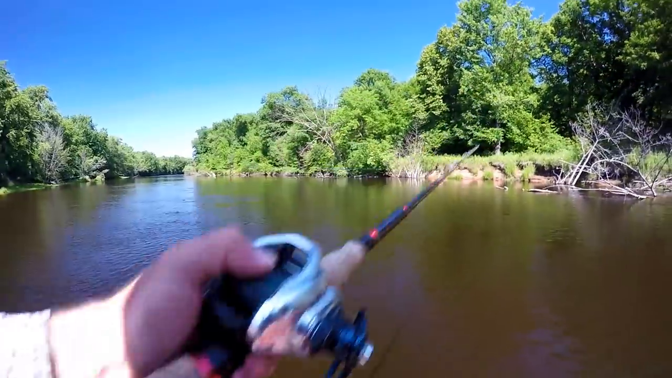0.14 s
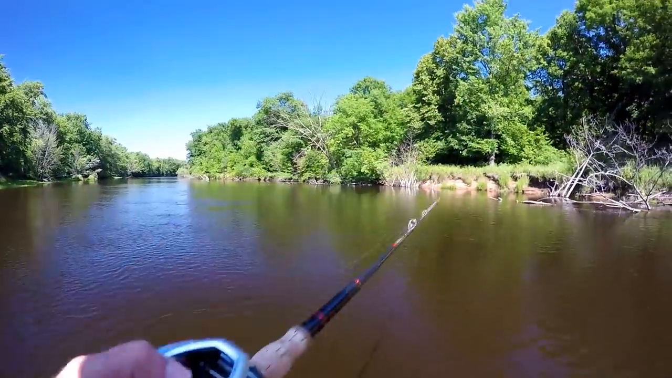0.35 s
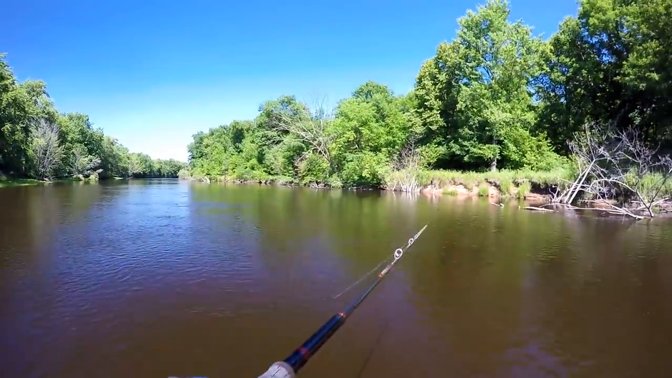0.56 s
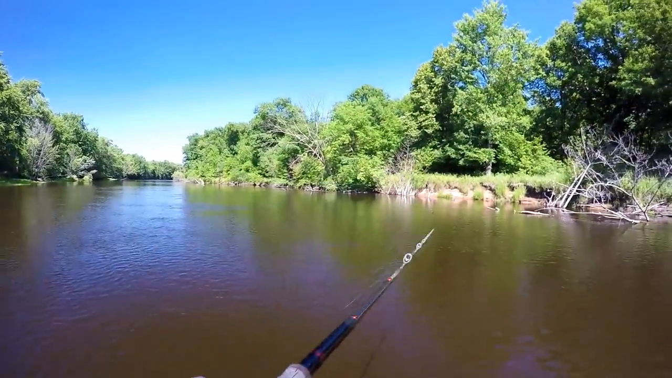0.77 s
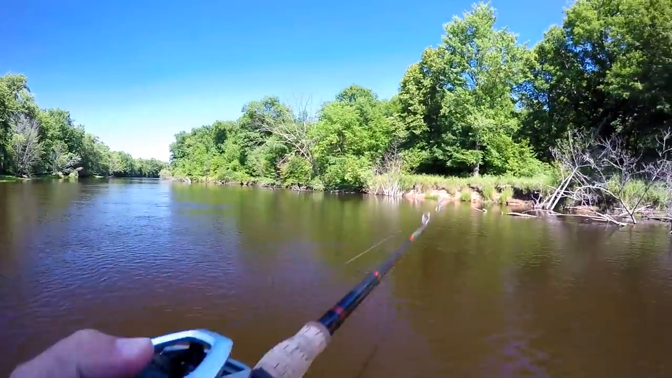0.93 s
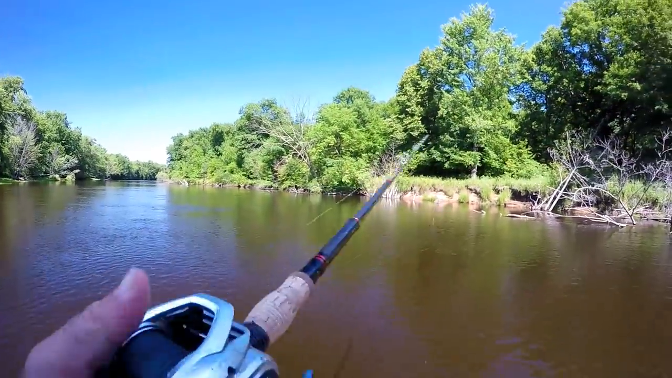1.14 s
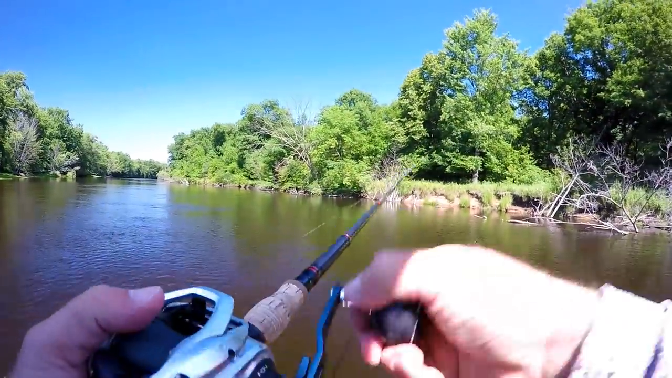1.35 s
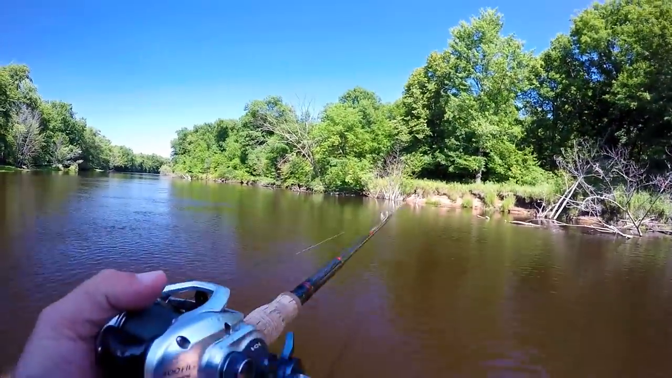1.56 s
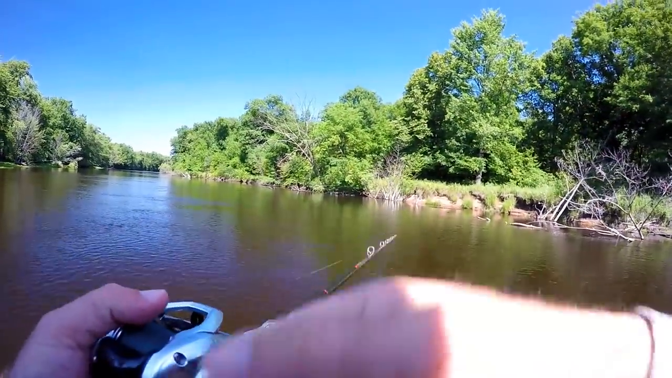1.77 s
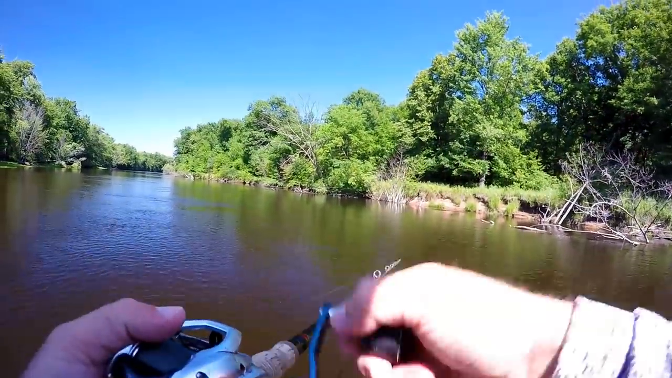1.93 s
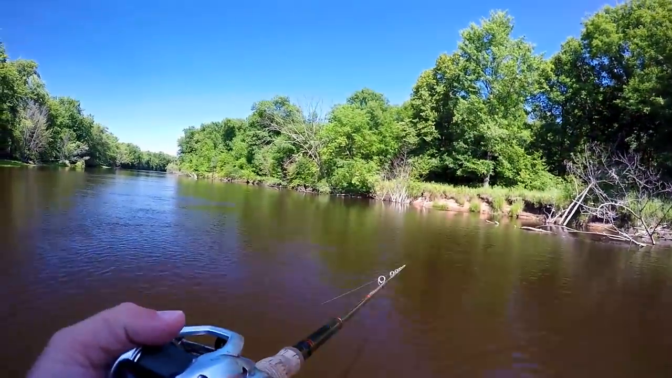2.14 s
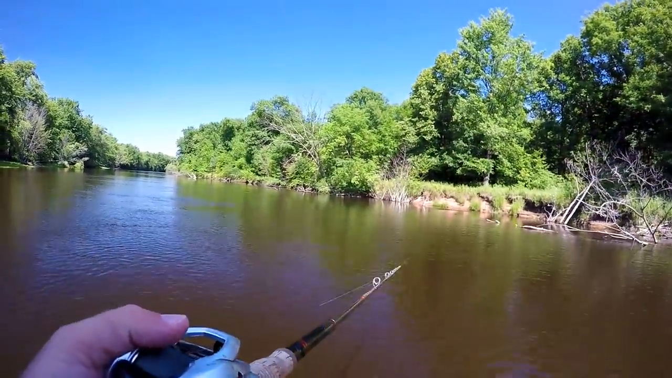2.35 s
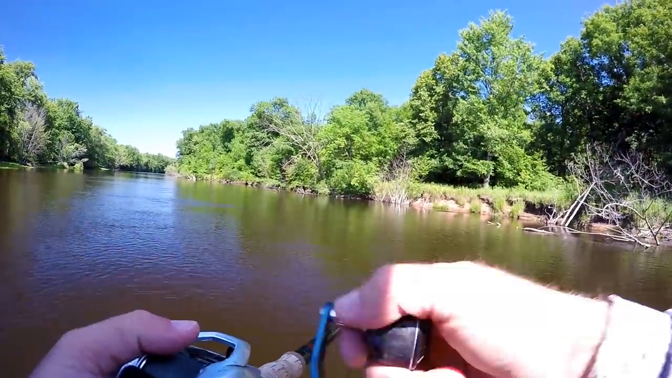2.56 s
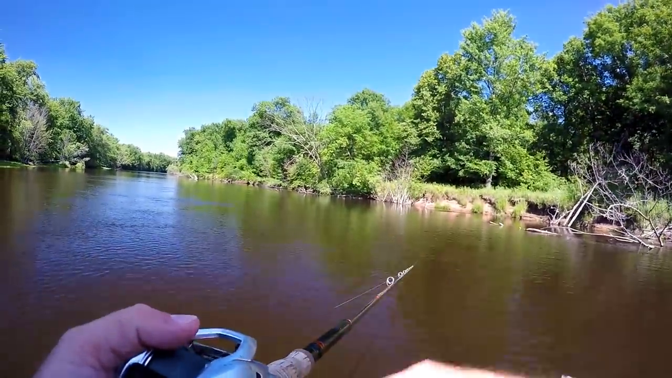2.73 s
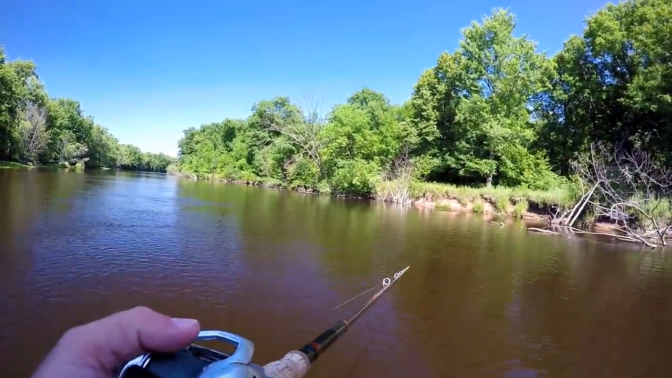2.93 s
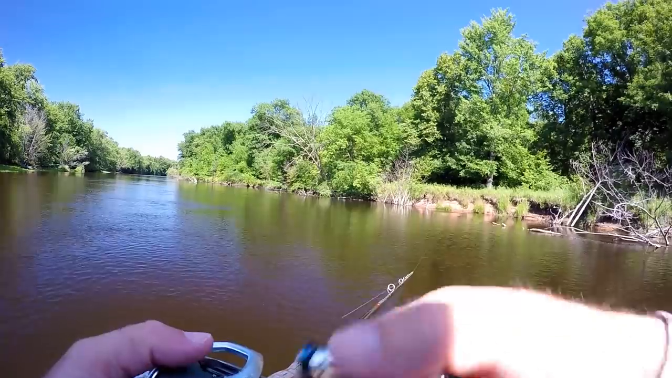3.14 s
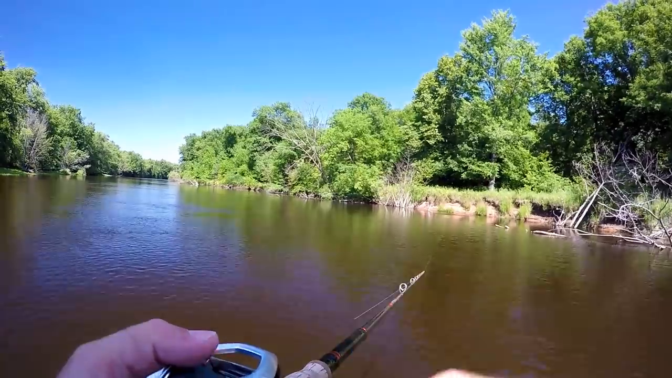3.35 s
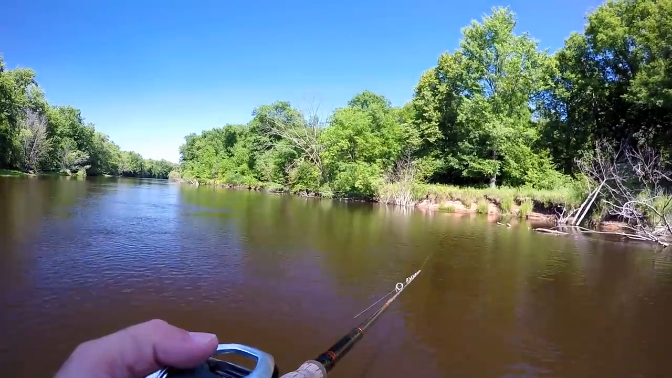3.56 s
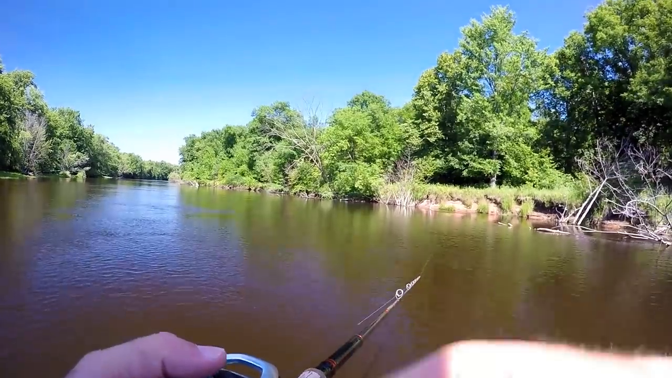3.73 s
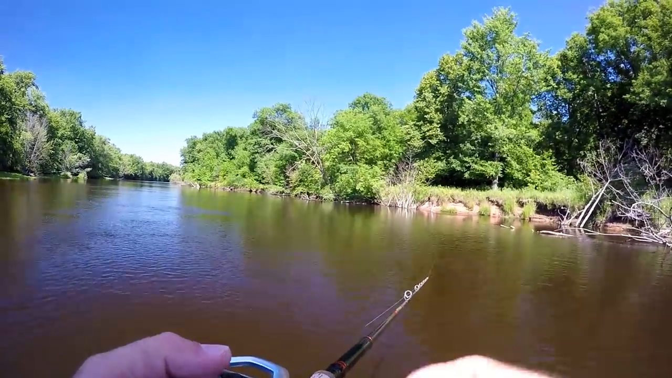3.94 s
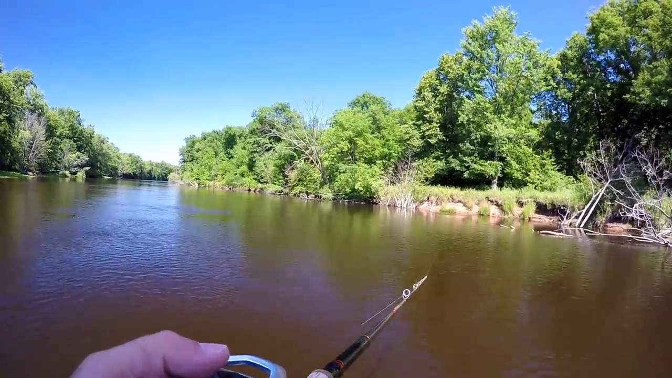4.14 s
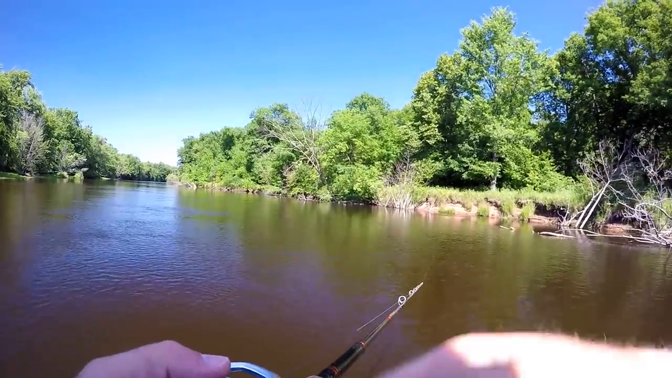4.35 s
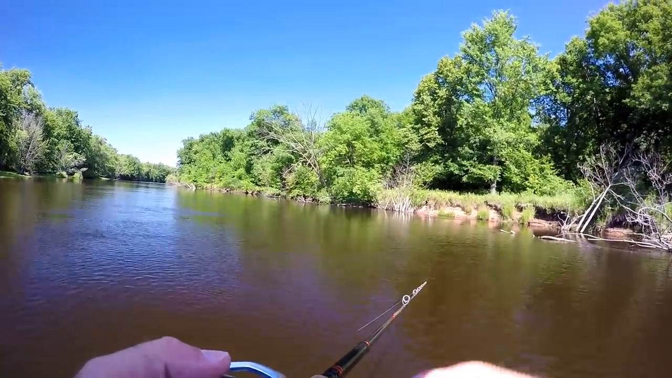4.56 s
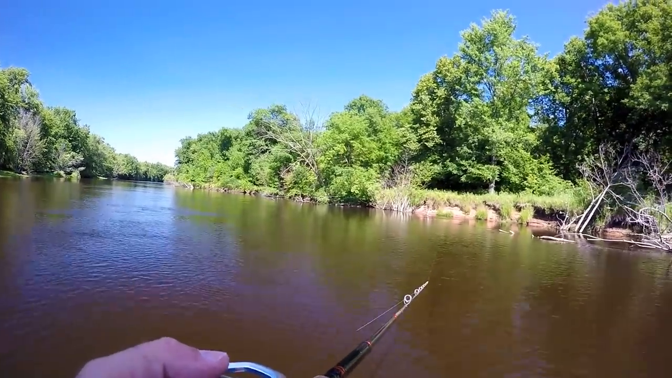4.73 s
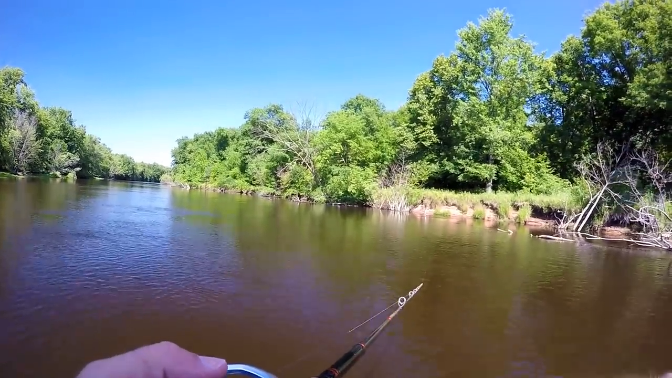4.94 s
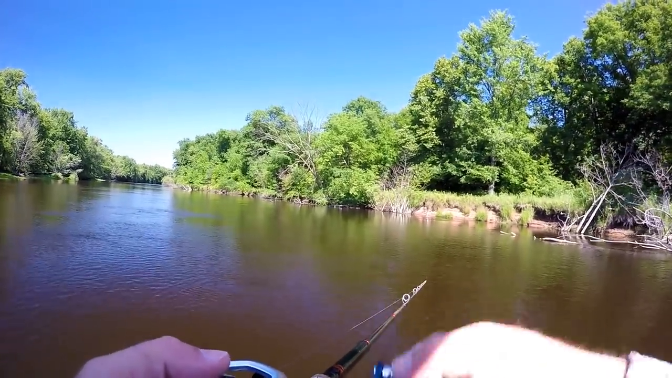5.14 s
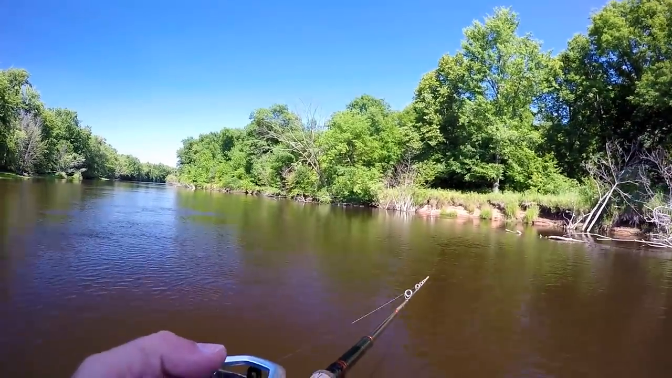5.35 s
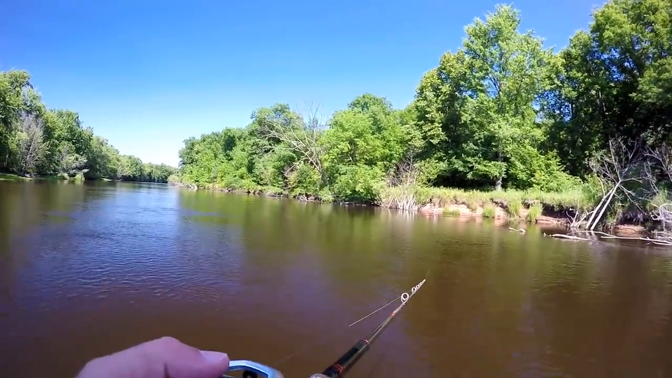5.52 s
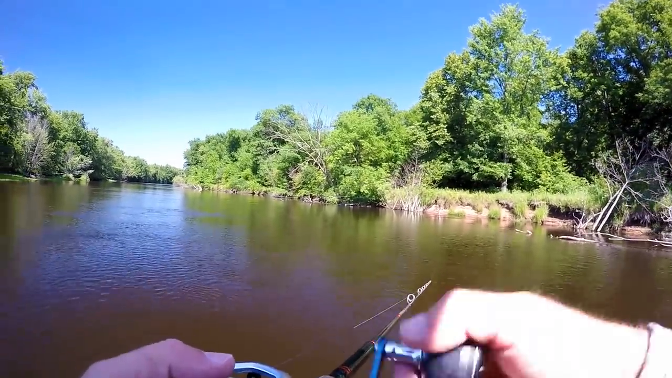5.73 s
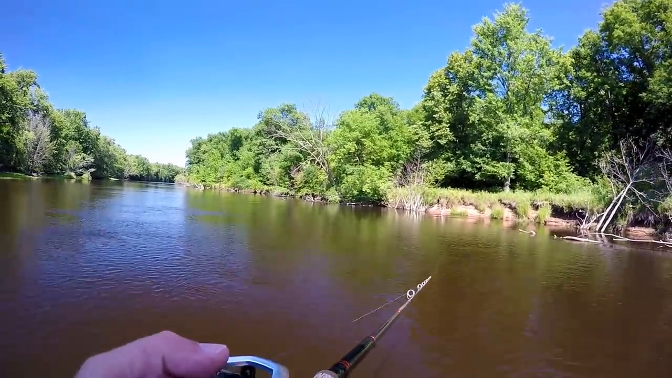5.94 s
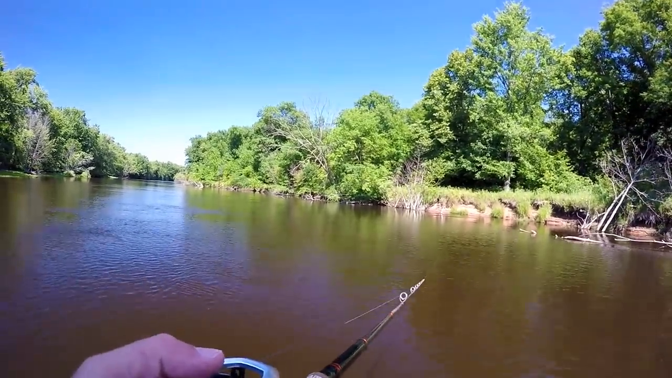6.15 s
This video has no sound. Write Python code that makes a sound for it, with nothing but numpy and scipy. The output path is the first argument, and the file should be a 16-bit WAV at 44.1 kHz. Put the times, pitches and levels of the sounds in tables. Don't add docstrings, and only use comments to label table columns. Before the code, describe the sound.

Close to the microphone, a cast sends wet line whirring and slapping through rod guides for under a second, fading as it slows. Soft knocks follow, then one sharp, loud metallic snap of the reel clutch. Quiet winding begins with a faint gear hum, while water glugs evenly under a small boat about eight times a second. Birds chip and whistle over river wash and light wind rumble.

```python
import sys
import numpy as np
from scipy import signal
from scipy.fft import rfft, irfft
from scipy.io import wavfile

SR = 44100
rng = np.random.default_rng(int(sys.argv[2]) if len(sys.argv) > 2 else 0)


def makeup_ratio(level_db):
    decades = np.asarray(level_db, float) / 20
    return 10 ** decades


def materialize(psi):
    bounded = np.clip(np.atleast_2d(psi).T, -1, 1)
    quanta = np.round(bounded * 32767).astype(np.int16)
    wavfile.write(sys.argv[1], SR, quanta)


N = 272979
TOP_EDGE_HZ = 15480


def rms_one(x):
    return x / np.sqrt(np.mean(x ** 2) + 1e-20)


def low_pass(x, order, hz):
    return signal.lfilter(*signal.butter(order, hz, fs=SR), x)


def in_time(rows, off_db=-120):
    s, *columns = np.transpose(rows)
    return [np.interp(np.arange(N) / SR, s, c, left=off_db, right=off_db) for c in columns]


def drift(rate_hz):
    r = np.exp(-2 * np.pi * rate_hz / SR)
    return rms_one(signal.lfilter([1], [1, -2 * r, r * r], rng.standard_normal(N + SR))[SR:])


def swell(s, half_s):
    return np.exp(-((np.arange(N) / SR - s) / half_s) ** 2)


def coloured(points):
    hz, db = np.transpose(points)
    grid = np.maximum(np.fft.rfftfreq(N, 1 / SR), 1)
    gain = makeup_ratio(np.interp(np.log(grid), np.log(hz), db))
    return rms_one(irfft(rfft(rng.standard_normal(N)) * gain, N))


def sliding(hz, width_hz):
    low = signal.butter(2, width_hz / 2, fs=SR, output="sos")
    slow = signal.sosfilt(low, rng.standard_normal((2, N)))
    turn = 2 * np.pi * np.cumsum(hz) / SR
    return rms_one(slow[0] * np.cos(turn) + slow[1] * np.sin(turn))


def resonances(x, peaks):
    out = np.zeros(N)
    for k, (hz, width, db) in enumerate(peaks):
        r = np.exp(-np.pi * width / SR)
        top = makeup_ratio(db) * (1 - r * r) / 2 * (-1) ** k
        out += signal.lfilter([top, 0, -top], [1, -2 * r * np.cos(2 * np.pi * hz / SR), r * r], x + 1e-18)
    return out


def ring(x, hz, t60):
    r, w = makeup_ratio(-60 / (t60 * SR)), 2 * np.pi * hz / SR
    return signal.lfilter([0, np.sin(w)], [1, -2 * r * np.cos(w), r * r], x + 1e-18)


def add(out, s, sound):
    i = round(s * SR)
    out[i:i + len(sound)] += sound[:N - i]


def glide(rows, fade_s):
    s, hz, db = np.transpose(rows)
    t = np.arange(s[0], s[-1], 1 / SR)
    fade = np.clip(np.minimum(t - s[0], s[-1] - t) / fade_s, 0, 1)
    return fade * makeup_ratio(np.interp(t, s, db)) * np.sin(2 * np.pi * np.cumsum(np.interp(t, s, hz)) / SR)


# pitch_hz [Hz], level_db [dB per Hz]
RIVER_COLOUR = [(59, -25), (100, 4), (149, -3), (263, -3), (338, -3.5), (585, 1), (706, -7), (1080, -7.5),
                (1410, -8), (1670, -13.5), (2660, -18), (4490, -14.5), (5430, -25), (15200, -37)]


def river():
    since_wake = np.arange(N) / SR - 1.01
    swish_db = 8.5 * swell(0.24, half_s=0.215)
    wake_db = 5 * np.exp(-np.abs(since_wake) / np.where(since_wake < 0, .12, 0.34))
    lull_db = -3.5 * swell(0.817, half_s=0.02)
    ripple_db = .5 * drift(6)
    return makeup_ratio(-57 + swish_db + wake_db + lull_db + ripple_db) * coloured(RIVER_COLOUR)


# start_s [s], level_db [dB]
WIND_LEVEL = [(0, -46), (.35, -49.5), (.6, -55), (.88, -57), (.98, -42.5), (1.07, -52), (1.28, -44),
              (1.45, -48), (1.78, -46.5), (1.92, -54.5), (2.3, -50), (3.0, -49), (3.7, -52), (4.1, -56),
              (4.9, -53), (5.1, -49.5), (5.4, -58.5), (6.19, -54)]
# pitch_hz [Hz], level_db [dB per Hz]
WIND_COLOUR = [(8.8, -35), (15, 4.5), (38, -3.5), (50, -1.5), (119, -19.5), (161, -29.5), (200, -16.5),
               (260, -60), (440, -120)]


def wind():
    gust_db, buffet_db = 1.0 * drift(6.7), 1.2 * drift(9.2)
    return makeup_ratio(in_time(WIND_LEVEL)[0] - 1.2 + gust_db + buffet_db) * coloured(WIND_COLOUR)


# start_s [s], level_db [dB]
CHIPS = [(1.176, -55.5), (2.0853, -54.5), (2.735, -55), (3.097, -62), (3.346, -53), (4.18, -58.5),
         (4.907, -54.5), (5.5447, -54)]
# time from its start_s [s], pitch_hz [Hz], level_db [dB]
CHIP = [(0, 9000, -14), (.004, 8000, -1), (.0065, 7200, -20), (.009, 6200, -5), (.0115, 5400, -20),
        (.0145, 4600, 2), (.018, 4200, -14)]
# delay_s [s], level_db [dB]
CHIP_ECHOES = [
    (.0105, -5),
    (.024, -11),
]
# start_s [s], length_s [s], from_hz [Hz], to_hz [Hz], level_db [dB]
WHISTLES = [(1.318, 0.066, 6600, 6000, -67), (1.474, 0.062, 6750, 6150, -62),
            (1.532, 0.032, 6250, 4770, -65), (1.63, .045, 7300, 7150, -76),
            (1.674, .034, 7150, 7520, -71.5), (1.704, 0.026, 7520, 7300, -73),
            (1.815, 0.013, 5600, 5300, -63.5), (1.824, 0.024, 5800, 6500, -62.5),
            (1.845, 0.015, 6640, 4830, -62.5), (2.958, 0.014, 2950, 3150, -62),
            (2.983, 0.019, 3030, 2700, -64), (3.022, .028, 2750, 3600, -63),
            (3.94, 0.069, 3970, 2900, -67.5), (4.05, 0.05, 2620, 2670, -65),
            (3.998, 0.062, 2910, 3910, -62), (4.117, .03, 4120, 2620, -62.5),
            (5.072, .018, 3800, 3180, -66), (5.165, 0.023, 3770, 4170, -68), (5.186, .016, 2950, 3330, -65),
            (5.207, 0.019, 3340, 2900, -61), (5.22, 0.013, 2780, 2200, -61),
            (5.251, 0.044, 3780, 3520, -62.5), (5.297, .018, 3520, 3200, -67),
            (6.038, .045, 2900, 4340, -72)]
# start_s [s], pitch_hz [Hz], level_db [dB]
TRILL = [
    (1.65, 4650, -68.5),
    (1.74, 4600, -72),
    (1.785, 5200, -65),
    (1.815, 5000, -66),
]


def birds():
    chips, whistles, t = np.zeros(N), np.zeros(N), np.arange(3000) / SR
    for s, db in CHIPS:
        add(chips, s, makeup_ratio(db) * glide(CHIP, fade_s=0.0018))
    trees = makeup_ratio(-30) * rng.standard_normal(len(t)) * np.exp(-t / 0.03)
    for delay_s, db in CHIP_ECHOES:
        add(trees, delay_s, np.array([makeup_ratio(db)]))
    echoes = low_pass(signal.oaconvolve(chips, trees)[:N], 2, 5200)
    for s, length, from_hz, to_hz, db in WHISTLES:
        middle = (length * 0.54, .4 * from_hz + .6 * to_hz, db)
        add(whistles, s, glide([(0, from_hz, db - 3.0), middle, (length, to_hz, db + 2.0)], fade_s=0.0023))
    trill = glide(TRILL, fade_s=.003)
    rolls_per_s = 68
    roll = np.sin(np.pi * rolls_per_s * np.arange(len(trill)) / SR) ** 4
    add(whistles, TRILL[0][0], trill * roll)
    return chips + echoes + whistles * makeup_ratio(-2.5 + 3 * drift(150))


# start_s [s], push_db [dB],
# ring_db above the push [dB], last squeak_db [dB]
GLUGS = [(0.0868, -45, 8.5, -49), (0.21, -40, 2, -48), (0.328, -57, 16.5, -53),
         (0.4486, -42.5, 5, -53), (0.561, -46, -13, -50), (0.6811, -44.5, 4.5, -53),
         (0.802, -43.5, 2.5, -50), (0.928, -41.5, 1, -47), (1.0526, -38.5, -7, -48.5),
         (1.168, -44, 1.5, -42),
         (1.5849, -42.5, -4, -49), (1.7095, -40.5, 0.5, -45), (1.8429, -51, -5, -53),
              (1.974, -46, -9, -54), (2.105, -42.5, -1, -52.5), (2.247, -43.5, -9.5, -51.5),
              (2.3783, -51.5, -4, -53), (2.512, -41.5, -5, -50.5), (2.644, -38, -3, -47),
              (2.7757, -39, -8, -50.5), (2.897, -43, -7, -48), (3.026, -43.5, -2, -49),
              (3.1654, -41.5, -12, -55), (3.2973, -39.5, 0.5, -48), (3.4178, -41.5, -2, -48),
              (3.533, -49, -13.5, -50), (3.6843, -45.5, -10, -45.5),
         (3.8185, -40, 0.5, -61), (3.9381, -39, 3, -47), (4.0592, -39.5, -0.5, -46),
              (4.1876, -42, -2.5, -54), (4.317, -40, -3.5, -54), (4.4432, -38, 2, -52.5),
              (4.5604, -36, -10, -46), (4.6803, -39, -5, -49), (4.802, -41, -5, -48),
              (4.931, -37.5, -11.5, -49), (5.0527, -37.5, -6, -40.5), (5.1758, -39, -5, -48),
              (5.303, -37.5, -4, -57), (5.439, -39.5, -10.5, -49), (5.5683, -34.5, -3.5, -40),
              (5.693, -38, -2, -45), (5.821, -37, -20, -49), (5.953, -42.5, -4, -47),
              (6.087, -39.5, -6.5, -53)]
GLUG_SHAPE_S = [0, .004, .007, .012, .02, .0245]
# pitch_hz [Hz], width_hz [Hz], level_db [dB]
HULL = [(260, 142, -2), (734, 226, 1.5), (1208, 160, -3)]


def glugs():
    lead_s, rise_s, start_hz, top_hz = 0.0035, 0.0091, 174, 1446
    out, t = np.zeros(N), np.arange(1200) / SR
    rows = GLUGS
    chance, wobble = rng.standard_normal((len(rows), 3)), rng.standard_normal((len(rows), 18))
    for (s, push_db, ring_db, squeak_db), (size, pace, start), bumps in zip(rows, chance, wobble):
        bump_s = np.linspace(0, t[-1], len(bumps))
        climb = 1 - np.exp(-np.maximum(t - lead_s, 0) / (rise_s * (1 + 0.043 * pace)))
        hz = np.maximum(top_hz * (1 + 0.025 * size) * climb, start_hz)
        hz = hz * (1 + .035 * np.interp(t, bump_s, bumps[::-1]))
        corners_db = [push_db + 0.083, push_db - 0.5, push_db + ring_db + 1.5, squeak_db + 0.09]
        height = np.interp(t, GLUG_SHAPE_S, [0, *makeup_ratio(corners_db), 0])
        uneven = makeup_ratio(2.2 * np.interp(t, bump_s, bumps))
        phase = 2 * np.pi * np.cumsum(hz) / SR + 1.24 + .5 * start
        add(out, s - lead_s, height * uneven * np.sin(phase))
    return makeup_ratio(1.5) * resonances(out, HULL)


# start_s [s], level_db [dB]
RUSTLE = [
    (2.7, -95),
    (2.86, -80),
    (2.93, -80),
    (3.02, -95),
]


def rustle():
    return makeup_ratio(in_time(RUSTLE)[0]) * rms_one(np.diff(rng.standard_normal(N + 1)))


# start_s [s], level_db [dB]
GRIP = [(.85, -87), (.87, -69), (.9, -72), (.93, -67), (.96, -67), (.975, -63), (.995, -67), (1.05, -72),
        (1.2, -80), (1.27, -74), (1.36, -77), (1.47, -74), (1.56, -77), (1.65, -88)]
# pitch_hz [Hz], level_db [dB per Hz]
GRIP_COLOUR = [(900, -30.5), (2000, -2), (5000, -3), (8000, 1), (15000, -13.5)]


def grip():
    return makeup_ratio(in_time(GRIP)[0] + 0.9 * drift(92)) * coloured(GRIP_COLOUR)


# start_s [s], level_db [dB], pitch_hz [Hz], t60_s [s]
KNOCKS = [(0.002, -38.5, 232, 0.037), (0.65, -37, 230, 0.1), (0.671, -35.5, 103, 0.12),
          (0.91, -34, 240, 0.014), (.75, -27.5, 477, 0.019), (1.017, -32.5, 150, .08),
          (1.02, -31, 320, .07), (1.062, -40.5, 190, 0.061), (1.33, -39.5, 237, 0.068)]


def knocks():
    out, push = np.zeros(N), np.pad(np.hanning(90) / 45, (0, 6000))
    for s, db, hz, t60 in KNOCKS:
        add(out, s, makeup_ratio(db) * ring(push, hz, t60))
    return out


# start_s [s], level_db [dB]
WINDING = [(1.08, -53), (1.2, -57), (1.36, -56), (1.53, -53), (1.7, -60), (2.12, -59.5), (2.3, -58),
           (2.9, -57), (3.09, -59), (3.34, -54.5), (3.76, -59.5), (3.91, -55), (4.37, -56.5), (4.64, -55),
           (5.0, -58.5), (5.25, -55.5), (5.89, -56.5), (6.19, -61.5)]
# pitch_hz [Hz], width_hz [Hz], level_db [dB]
GEARS_HIGH = [(1505, 150, -1.2), (1676, 91, -2), (1920, 250, -0.79)]
GEARS_LOW = [(412, 46, -2.5), (595.6, 36, -2.5), (902, 58, 0), (1082, 30, 0.5)]
# middle_s [s], half_length_s [s], pitch_hz [Hz], level_db [dB]
RUBS = [(1.29, 0.037, 1530, -60.5), (1.452, 0.056, 1593, -60), (1.766, 0.06, 1490, -65),
        (1.13, 0.048, 1138, -60), (1.24, 0.037, 1060, -57), (1.567, 0.073, 1134, -63),
        (2.105, 0.073, 3310, -70), (2.91, 0.28, 3360, -80)]


def gears():
    out, effort_db = np.zeros(N), in_time(WINDING)[0]
    high_db = -7 + 0.83 * np.arange(N) / SR
    for level_db, peaks in ((high_db, GEARS_HIGH), (-2.5, GEARS_LOW)):
        hum = np.zeros(N)
        for hz, width, db in peaks:
            waxing = makeup_ratio(db + 2.9 * drift(5.1))
            hum += waxing * rms_one(resonances(rng.standard_normal(N), [(hz, width, 0)]))
        out += makeup_ratio(effort_db + level_db) * rms_one(hum)
    for s, half_s, hz, db in RUBS:
        out += makeup_ratio(db) * swell(s, half_s) * sliding(np.full(N, hz), width_hz=40)
    return out


# start_s [s], level_db [dB], rattle_s [s], dullness cut_hz [Hz]
CONTACTS = [(0.751, -54, 0.0015, 2500), (0.851, -44.5, 0.00066, 5800), (0.868, -48.5, 0.0015, 11800),
            (0.888, -57, 0.0039, 9000), (0.938, -53.5, 0.0038, 7100), (0.972, -39, 0.0033, 1450),
            (0.9898, -38.5, 0.001, 7000), (1.126, -55, 0.0017, 6000), (1.216, -63, .002, 8000),
            (1.494, -58, 0.0019, 8000), (2.1, -49.5, 0.0019, 3500), (2.395, -56, 0.0011, 9000),
            (2.643, -55, 0.0011, 5000), (3.538, -53, 0.00071, 6000), (3.947, -52.5, 0.00093, 4000),
            (4.675, -52, 0.00081, 4000), (4.7955, -53.5, 0.001, 4000)]
SNAP = [(1.0126, -21.5, 0.0029, 12000), (1.0167, -9, 0.0011, 7000), (1.0203, -16.5, 0.0012, 15030),
        (1.0228, -18, .0008, 2000), (1.0264, -39, 0.0027, 5000), (1.03, -33, .001, 8000),
        (1.0334, -19, 0.0051, 1510)]
# start_s [s], level_db [dB], pitch_hz [Hz], t60_s [s]
LATCH = [(1.0162, -6, 3950, .006), (1.0162, -6.5, 4800, .006), (1.0163, -18, 10500, .004),
         (1.0171, -9, 2650, .008), (1.0203, -11, 6170, .007), (1.0203, -21, 13200, .004),
         (1.0228, -10, 1700, .004)]
# pitch_hz [Hz], level_db [dB], t60_s [s]
BODY = [(409.6, -16.5, 0.045), (600, -27, .02), (916, -25.5, 0.035), (1300, -23, 0.0065),
        (2000, -15.5, 0.0098),
        (2560, -9, 0.0083), (2830, -17, 0.011), (3620, -11, 0.003), (4230, -10.5, 0.0066),
             (4830, -4, 0.0036), (6460, -8, 0.011), (6600, -10, 0.0075), (11340, -30.5, 0.004),
             (13200, -20, 0.0034)]


def contacts():
    force, latch, t = np.zeros(N), np.zeros(N), np.arange(700) / SR
    grit = rng.standard_normal((len(SNAP + CONTACTS), len(t)))
    grit[:, 0] = 4.76
    for (s, db, length, cut_hz), noise in zip(SNAP + CONTACTS, grit):
        rattle = makeup_ratio(db) * noise * np.exp(-t / length)
        add(force, s, low_pass(rattle, 2, min(cut_hz, 19000)))
    for s, db, hz, t60 in LATCH:
        add(latch, s, makeup_ratio(db) * ring(1. * (t == 0), hz, t60))
    crack = signal.lfilter(*signal.butter(2, 2200, "high", fs=SR), force)
    body = np.zeros(N)
    for k, (hz, db, t60) in enumerate(BODY):
        body += (-1) ** k * makeup_ratio(db - 8) * ring(force, hz, t60)
    band = signal.butter(4, [200, 15300], "band", fs=SR, output="sos")
    return signal.sosfilt(band, makeup_ratio(3.5) * crack + body + latch)


# start_s [s], peak level_db [dB], pitch_hz [Hz]
SLAPS_LOW = [(0.0983, -38, 6700), (0.1848, -39, 6200), (0.2154, -37, 6610), (0.2224, -33.5, 6640),
             (0.227, -35.5, 4400), (0.2717, -37, 6500), (0.285, -36, 6810), (0.3468, -30.5, 6860),
             (0.357, -34, 6800), (0.4, -40, 6960), (0.4069, -44, 6600), (0.4164, -40, 6840),
             (0.4339, -37, 6750), (0.4664, -42, 4360), (0.4805, -40, 6800), (0.4914, -42, 4200),
             (0.501, -40, 4110), (0.5124, -43, 3930), (0.519, -44, 6770), (0.526, -48, 6050),
             (0.5322, -43, 4930), (0.5494, -51, 7180), (0.561, -52, 6630), (0.5694, -48, 6800),
             (0.5885, -46, 4800)]
SLAPS_TOP = [(0.0443, -47, 13400), (0.0687, -41, 13200), (0.0804, -43, 10600), (0.118, -40, 10500),
             (0.1544, -38, 10600), (0.2069, -41, 12600), (0.2288, -38, 12100), (0.2882, -42, 10300),
             (0.3042, -45, 10400), (0.3264, -44, 15000), (0.3694, -41, 11700), (0.3939, -46, 13500),
             (0.4113, -41, 12900), (0.4934, -43, 11300), (0.5494, -44, 11100), (0.5881, -45, 12900)]


def hard_slaps():
    out, t = np.zeros(N), np.arange(300) / SR
    rise_s, width_hz, both_guides_hz = .0006, 2600, 4330 + 6610
    rows = SLAPS_LOW + SLAPS_TOP
    noises = rng.standard_normal((len(rows), len(t)))
    for k, ((s, db, hz), noise) in enumerate(zip(rows, noises)):
        is_slap = k < len(SLAPS_LOW)
        puff = low_pass(noise + 1, 1, width_hz / 2) * t / rise_s * np.exp(1 - t / rise_s)
        tone = np.sin(2 * np.pi * hz * t)
        if is_slap:
            tone = tone + .5 * np.sin(2 * np.pi * (both_guides_hz - hz) * t)
        add(out, s, makeup_ratio(db + (-1.5 if is_slap else -6)) * puff * tone)
    return out


def slap_bursts(per_s, length_s):
    kicks = rng.exponential(1, N) * (rng.random(N) < per_s / SR)
    shape = signal.lfilter([1], [1, -np.exp(-1 / (length_s * SR))], kicks)
    return rms_one(np.log(shape + 0.22) - np.mean(np.log(shape + 0.36)))


# start_s [s], its speed as level_db [dB]
CAST = [(0.0, -53), (0.06, -56.5), (0.14, -47), (.19, -49.5), (.225, -47), (.25, -47), (0.345, -48.5),
        (.39, -51.5), (.435, -50.5), (.46, -55), (.52, -52), (0.6, -58.5), (0.64, -62), (0.695, -61.5),
        (0.73, -54), (0.752, -56)]
# pitch_hz [Hz], width_hz [Hz], level_db [dB]
GUIDES = [(2560, 490, 2.5), (3300, 390, -3), (5400, 960, 3.5), (8000, 890, 7)]
FRAME = [(464, 63, 5.5), (963, 92, 4.5), (710, 170, -4.5), (1120, 190, -7.5), (1770, 440, -6.5),
         (240, 48, -2)]
HISS = [(9400, 840, -5.5), (13100, 900, -2.5), (15100, 700, -7)]
# start_s [s], upper guide pitch_hz [Hz]
WHIP = [
    (.715, 8000),
    (.75, 4656),
]
# start_s [s], pitch_hz [Hz]
TIP = [(0, 12000), (.1, 11000), (.2, 10600), (.3, 10300), (.38, 11600), (.45, 11300), (.57, 11100),
       (.75, 11300)]
# start_s [s], pitch_hz [Hz], level_db [dB]
THUMB = [(.42, 3520, -82), (.55, 3413, -63), (.63, 3300, -66), (.68, 2900, -72), (.73, 2200, -66),
         (.745, 1910, -59), (.765, 1697, -57)]


def cast():
    t = np.arange(N) / SR
    kink_db = 5.2 * swell(0.353, half_s=0.014)
    speed_db = in_time(CAST, off_db=-200)[0] + 50 + kink_db
    bursts = slap_bursts(per_s=230, length_s=0.00049)

    settle = np.exp(-t / 0.069)
    lower_hz, upper_hz = 4330 * (1 + .11 * settle), 6610 * (1 + 0.044 * settle)
    upper_hz = np.where(t < WHIP[0][0], upper_hz, np.interp(t, *np.transpose(WHIP)))
    lower_db = -52.5 + speed_db - 2.5 + 1.5 * bursts + 1.6 * drift(82)
    lower = makeup_ratio(lower_db) * sliding(lower_hz * (1 + .03 * drift(12)), width_hz=650)
    guide_db = -47 + 1.1 * speed_db - 6.5
    upper_db = guide_db + 3.6 * np.exp(-t / 0.072) + 2.1 * bursts + 2.0 * drift(110)
    upper = makeup_ratio(upper_db) * sliding(upper_hz * (1 + 0.023 * drift(11)), width_hz=730)

    between_db = guide_db - 7.3 * np.exp(-(t / 0.05) ** 2) - 4.6 * (t > WHIP[0][0]) + 2.9 * bursts
    dull = signal.butter(6, 9100, fs=SR, output="sos")
    between = makeup_ratio(between_db) * rms_one(signal.sosfilt(dull, resonances(rng.standard_normal(N), GUIDES)))

    tip = sliding(np.interp(t, *np.transpose(TIP)), width_hz=910)
    hiss = rms_one(resonances(rng.standard_normal(N), HISS))
    shaking = rng.standard_normal(N) * makeup_ratio(1.6 * bursts + 1.5 * drift(25))
    frame = makeup_ratio(-47 + 1.14 * speed_db) * rms_one(resonances(shaking, FRAME))
    thumb_hz, thumb_db = in_time(THUMB)
    thumb = makeup_ratio(thumb_db + 3.4 * drift(40)) * sliding(thumb_hz, width_hz=190)
    whirr = hard_slaps() + thumb + lower + upper + between

    spray_db = -55 + 0.29 * speed_db - 12 * np.exp(-(t / 0.045) ** 2) - 1500 * np.maximum(t - 0.746, 0)
    spray_db = spray_db - 4.0 + 1.5 * bursts + 1.2 * drift(120)
    return whirr + makeup_ratio(spray_db) * (0.54 * tip + 0.82 * hiss) + frame


def scene():
    events = contacts() + knocks() + glugs() + birds()
    cloth, hand, air = rustle(), grip(), wind()
    top_edge = signal.ellip(12, .5, 60, TOP_EDGE_HZ, fs=SR, output="sos")
    steady = signal.sosfilt(top_edge, cast() + hand + river() + gears() + cloth)
    return (steady + events + air)[None]


def band_limit(x):
    return signal.sosfilt(signal.butter(12, 16470, fs=SR, output="sos"), x)


# start_s [s], level_db [dB]
TREBLE_DIPS = [(.9965, 0), (.9995, -40), (1.008, -40), (1.0095, 0), (1.033, 0), (1.036, -12), (1.05, 0)]


def record(dry):
    bass = signal.sosfiltfilt(signal.butter(4, 1500, fs=SR, output="sos"), dry)
    heard = bass + (dry - bass) * makeup_ratio(in_time(TREBLE_DIPS, off_db=2.0)[0])
    rounded = 1.25 * np.tanh(heard / 1.148)
    mix = signal.sosfilt(signal.cheby1(10, .5, TOP_EDGE_HZ, fs=SR, output="sos"), rounded)
    return band_limit(mix)


dry = scene()
out = record(dry)
materialize(out)
```